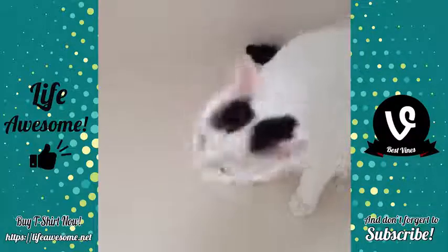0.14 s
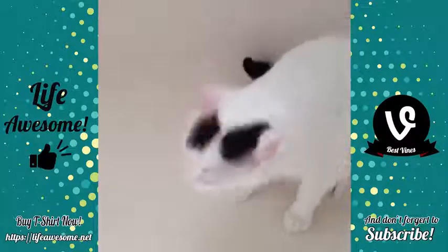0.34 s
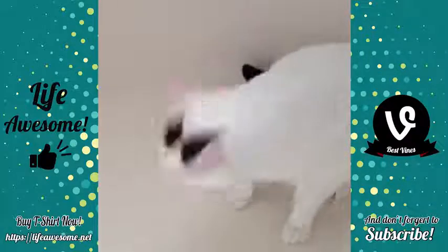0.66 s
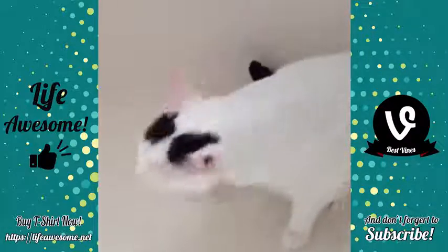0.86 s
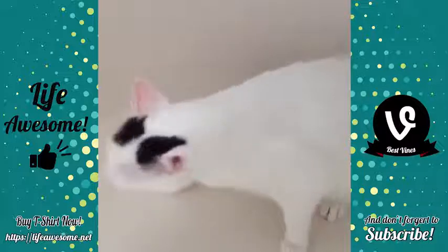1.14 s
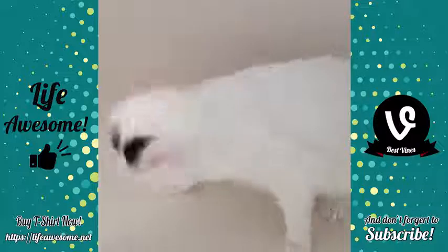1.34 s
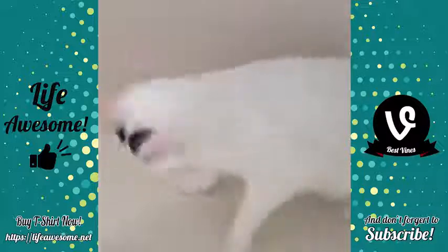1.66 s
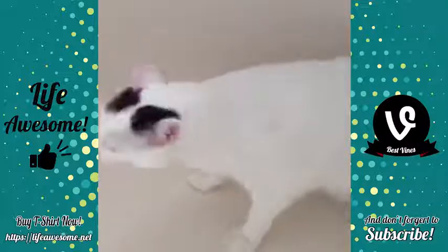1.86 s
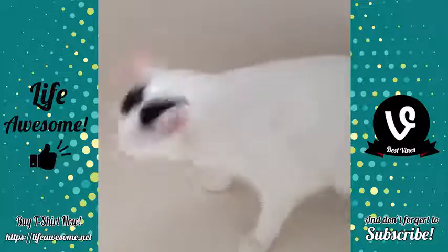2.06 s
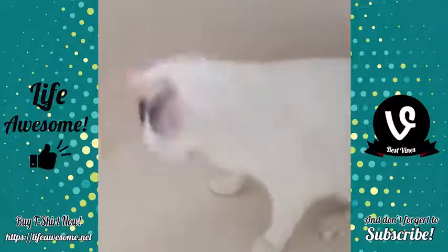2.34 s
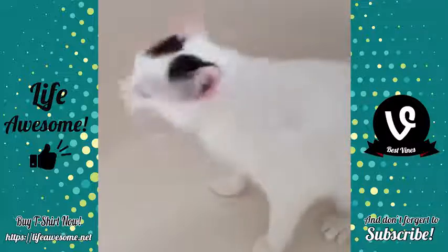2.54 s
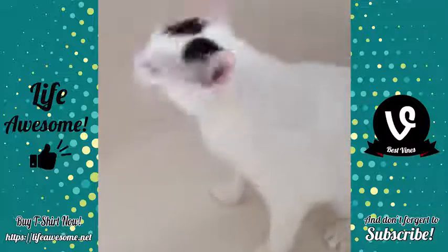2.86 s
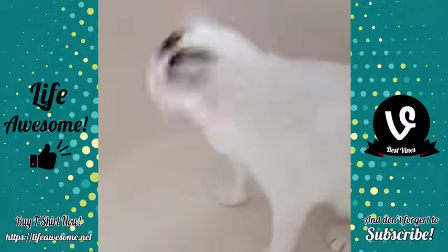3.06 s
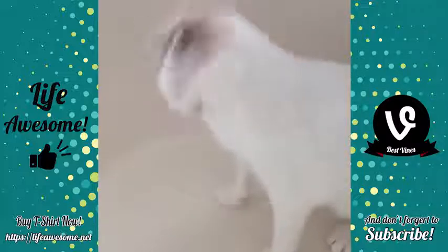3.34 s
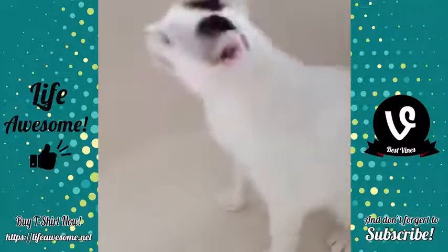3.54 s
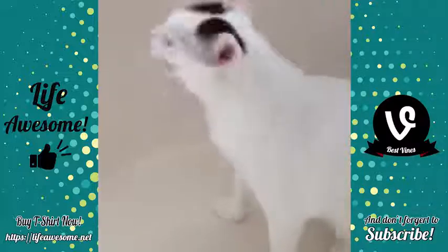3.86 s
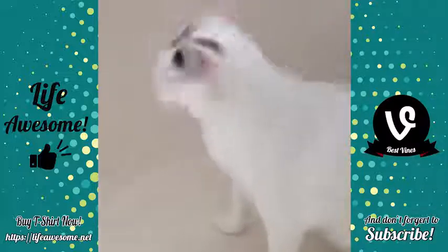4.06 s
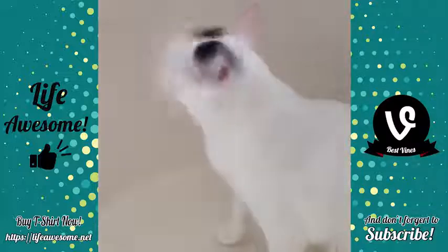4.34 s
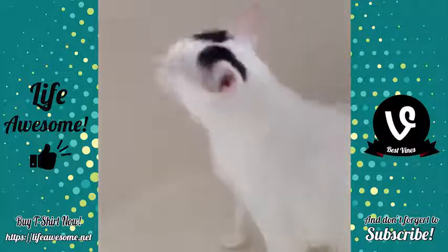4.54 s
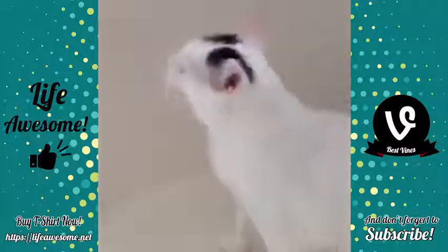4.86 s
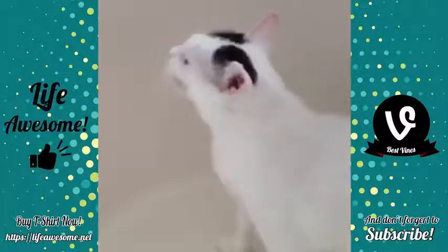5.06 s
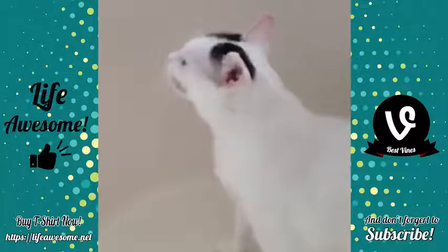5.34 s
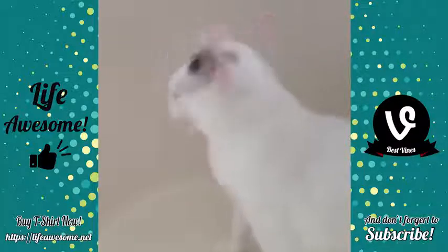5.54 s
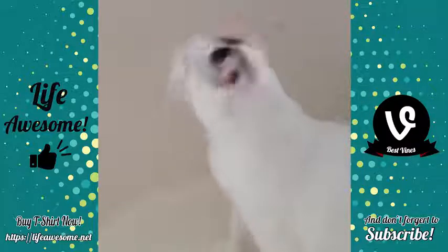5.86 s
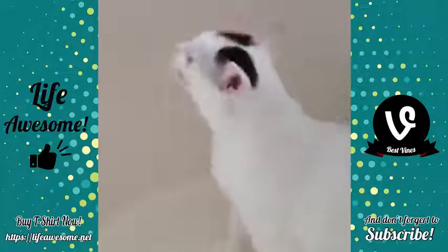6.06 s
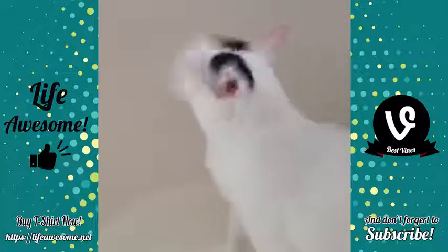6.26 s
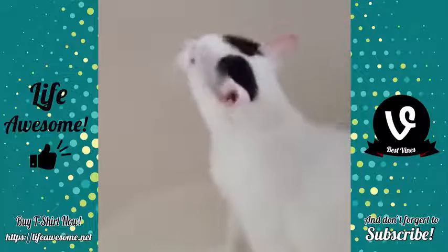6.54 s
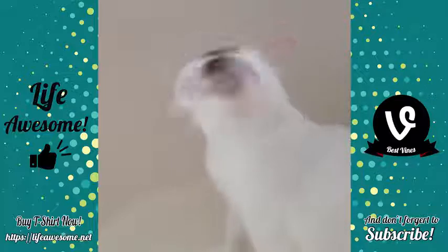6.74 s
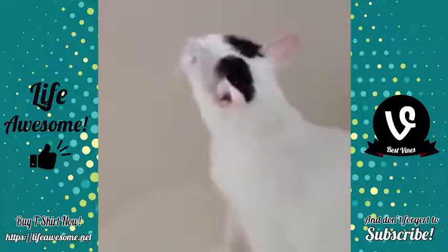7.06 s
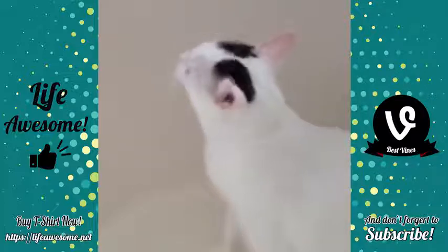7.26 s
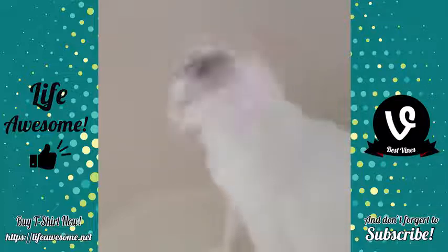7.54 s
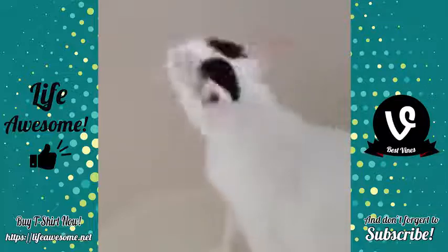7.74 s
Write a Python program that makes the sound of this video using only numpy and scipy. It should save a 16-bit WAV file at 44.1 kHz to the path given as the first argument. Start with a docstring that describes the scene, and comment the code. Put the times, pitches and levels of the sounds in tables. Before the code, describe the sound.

Close to a small microphone in a bare little room, a cat sneezes over and over, nearly three times a second. Each puff starts with a soft low pop and bursts into a short, bright nasal hiss, and the room rings briefly. A quick sniff precedes the next puff. Wet spits and tiny mouth clicks dot the first five seconds. Effort peaks around two seconds, then eases, with sniffs growing fainter. Faint humming air lies underneath.

```python
"""In a small bare room, close to a small microphone, a cat sneezes in a hissing fit; faint humming air lies under it.
Each puff opens with a low pop, then a turbulent noise jet hisses through the nose, bright near 12 kHz;
the room rings after it: noise echoes that fade band by band, and a few decaying bass tones.
Then comes a short sniff, noise through sinking airway resonances; wet spits and mouth clicks are snaps of noise.
About three puffs a second follow; the effort peaks at 2 s, then eases until the end."""
import sys
import numpy as np
from scipy import signal
from scipy.fft import rfft, irfft, next_fast_len
from scipy.io import wavfile
from scipy.ndimage import map_coordinates

SR = 44100
rng = np.random.default_rng(int(sys.argv[2]) if len(sys.argv) > 2 else 0)


def bounce(signal):
    """Save signal as a 16-bit WAV file at the path given by the first command-line argument."""
    frames = np.transpose(np.atleast_2d(signal))
    limited = np.clip(frames, -1, 1)
    pcm = np.round(limited * 32767).astype(np.int16)
    wavfile.write(sys.argv[1], SR, pcm)


N = 348831
TIME = np.arange(N) / SR

# Still air of the room: (frequency [Hz], relative density [dB per Hz])
AIR_SPECTRUM = [(30, -14), (65, -11), (125, -4.5), (155, 6), (250, 3), (450, -5.5), (1100, -7.5),
                (2500, -15), (4600, -10), (5300, -15.5), (9000, -17), (11500, -20), (15000, -16)]
AIR_DB = -74.5

# Sneeze puffs: (time [s], time to full flow [s], length of push [s], relative jet level [dB],
# lower mouth resonance [Hz], upper mouth resonance [Hz])
PUFFS = [(0.0, .025, 0.079, -33, 724, 1540), (.325, 0.028, 0.063, -32, 1100, 1430),
         (.673, 0.021, 0.078, -31.5, 600, 2110), (1.027, 0.027, 0.074, -31.5, 570, 1940),
         (1.375, 0.03, 0.075, -31, 960, 1520), (1.718, 0.03, 0.078, -30, 600, 1460),
         (2.054, .019, 0.078, -30.5, 1000, 1750), (2.404, 0.022, .076, -31, 940, 1310),
         (2.751, 0.026, 0.065, -30, 920, 1860), (3.075, 0.03, 0.078, -30.5, 880, 1840),
         (3.414, 0.021, 0.071, -32, 910, 1600), (3.745, 0.025, 0.075, -33, 860, 2030),
         (4.097, 0.029, 0.074, -31.5, 850, 1590), (4.442, 0.023, 0.078, -30.5, 830, 1930),
         (4.84, 0.028, .066, -32, 685, 2100), (5.201, .025, 0.082, -33, 745, 1980),
         (5.594, 0.028, .073, -31.5, 760, 1460), (5.969, 0.03, .076, -33, 820, 1930),
         (6.365, 0.032, 0.084, -34, 860, 2110), (6.805, .029, 0.094, -34, 860, 2080),
         (7.243, .027, .074, -32.5, 860, 1360), (7.601, 0.034, 0.084, -31.5, 800, 2040)]
# How hard the cat heaves: (time [s], effort [0-1])
EFFORT = [(0, 0.44), (1.0, 0.8), (2.0, 1.0), (3.3, 0.9), (4.1, 0.3), (5.0, 0.19), (7.8, 0)]
# The turbulent jet, before the resonances are added: (frequency [Hz], relative density [dB per Hz])
JET_SPECTRUM = [(40, -40), (130, -30.5), (200, -6), (400, -4), (850, 0), (1200, 1), (1900, 2), (2800, 2),
                (3600, -1), (4800, 0.5), (5100, -2), (6500, 3.5), (9300, -1), (15400, 1.5)]
# Settings that follow the effort: (when easy, at full effort)
CHEST_DB, THROAT_DB, LOWER_MOUTH_DB, SINUS_DB = (-0.45, 3.5), (0, 1.8), (5, 3), (1.5, 3)
NOSTRIL_HZ = (11710, 12100)
NOSTRIL_DB, UPPER_MOUTH_DB = 12.5, 2

# Ring time of the room: (frequency [Hz], time to fall by 60 dB [s])
ROOM_T60 = [(150, 0.55), (600, 0.24), (2000, 0.28), (5000, 0.3), (9000, 0.19), (12000, 0.23), (15000, 0.11)]
# Standing waves of the room: (frequency [Hz], relative level [dB])
ROOM_MODES = [(152, 6.5), (203, -12), (296, -13), (352, -4), (422, 4.5), (565, 5), (685, -4.5),
              (775, -10.5), (837, 0.5), (896, -3)]
MODE_T60_S = 0.26

# Rush of a sniff between its resonances: (frequency [Hz], relative density [dB per Hz])
INTAKE_SPECTRUM = [(200, -29), (700, -2), (1500, 4), (3200, 2), (6000, -4.5), (9000, -9.5), (12000, -6.5),
                   (15000, -11.5)]
# Airway resonances of a sniff, before each sniff shifts them: (frequency [Hz], height [dB])
AIRWAY_RESONANCES = [(1050, 11.5), (1420, 13), (2600, 16.5), (3780, 9), (4700, 12)]
# Sniff settings that follow the effort: (when easy, at full effort)
SNIFF_DB = (-73.5, -61.5)
SNIFF_LEAD_S = (0.064, 0.12)  # from the middle of a sniff to the next puff
SNIFF_SPREAD_S = (0.028, 0.037)  # of the bell-shaped swell
SNIFF_WIDTH_HZ = (300, 70)  # of the airway resonances
LAST_PAUSE_S = 0.35  # the last puff is followed by a sniff too, as if another came this much later

# Mouth clicks between puffs: (time [s], relative level [dB])
CLICKS = [(0.322, -54), (0.657, -61), (0.663, -46), (0.947, -48.5), (1.007, -54), (1.276, -46.5),
          (2.038, -64), (2.389, -56), (2.737, -57.5), (3.403, -45), (3.736, -49), (4.087, -50),
          (4.822, -55.5)]
# Wet spits inside the puffs: (time [s], relative level [dB])
SPITS = [(0.356, -18.5), (0.693, -27.5), (0.7025, -9.5), (1.055, -24), (1.393, -42.5), (1.412, -23.5),
         (1.4224, -13), (2.072, -24.5), (2.1064, -24), (2.420, -17.5), (2.773, -20), (3.434, -18.5),
         (3.467, -17), (3.788, -19)]

CUTOFF_HZ = 15350


def from_db(db):
    """Decibels to gain."""
    return 10 ** (np.asarray(db) / 20)


def rms_one(x):
    """Scale to unit power."""
    return x / np.sqrt(np.mean(x ** 2) + 1e-20)


def at_hz(points, hz):
    """Read a table along a log-frequency axis."""
    table_hz, value = np.transpose(points)
    return np.interp(np.log(np.maximum(hz, 1)), np.log(table_hz), value)


def hump(x, centre, width):
    """A bell of height 1 along frequency or time."""
    return np.exp(-0.5 * ((x - centre) / width) ** 2)


def spectrum_hz(size):
    """The frequencies in the spectrum of a sound of this many samples."""
    return np.arange(size // 2 + 1) * SR / size


def coloured(level_db, size):
    """Noise whose spectrum follows the function level_db(Hz)."""
    white = rfft(rng.standard_normal(size))
    return irfft(white * from_db(level_db(spectrum_hz(size))), size)


def flutter(t, rate):
    """Random wavering with a spread near 1, aiming at a new value `rate` times a second."""
    return np.interp(t * rate, np.arange(1024), rng.standard_normal(1024))


def by_effort(s, easy_and_full):
    """The value that the effort at this time sets between its easy and its full setting."""
    easy, full = easy_and_full
    return easy + (full - easy) * np.interp(s, *np.transpose(EFFORT))


def add(out, s, sound):
    """Mix a sound in at a time."""
    i = int(np.clip(round(s * SR), 0, N))
    out[i:i + len(sound)] += sound[:N - i]


def humming_air():
    """The still air of the room is steady noise, strongest in the bass, heard as a faint hum."""
    noise = coloured(lambda hz: at_hz(AIR_SPECTRUM, hz), size=next_fast_len(N))[:N]
    return from_db(AIR_DB) * rms_one(noise)


def puffs(nostril_width_hz=1450, chest_hz=300, chest_width_hz=380, throat_hz=1600, throat_width_hz=900,
          lower_width_hz=120, upper_width_hz=220, sinus_hz=4550, sinus_width_hz=240,
          opening=2.83, push_tilt_db=1.5, release_s=0.026,
          whistle_tilt_db=-3.0, whistle_release_s=0.048, whistle_db=1.6,
          flutter_db=1.5, flutter_rate=260, sputter_db=2.0, sputter_rate=80,
          level_db=0.81, pop_db=2.0, pop_s=0.015, pop_width_s=0.0044, pop_hz=420, pop_width_hz=470):
    """The airway opens with a low pop; pressure builds, holds and collapses; mucus makes the jet flutter."""
    out = np.zeros(N)
    t = np.arange(2 ** 14) / SR
    for s, rise, stop, jet_db, lower_hz, upper_hz in PUFFS:
        def tract(hz):
            """The resonances of chest, throat, mouth and sinuses colour the jet."""
            return (at_hz(JET_SPECTRUM, hz)
                    + by_effort(s, CHEST_DB) * hump(hz, chest_hz, chest_width_hz)
                    + by_effort(s, THROAT_DB) * hump(hz, throat_hz, throat_width_hz)
                    + by_effort(s, LOWER_MOUTH_DB) * hump(hz, lower_hz, lower_width_hz)
                    + UPPER_MOUTH_DB * hump(hz, upper_hz, upper_width_hz)
                    + by_effort(s, SINUS_DB) * hump(hz, sinus_hz, sinus_width_hz))

        def nostrils(hz):
            """The power that the narrow nostrils add on top of the jet."""
            lift = from_db(NOSTRIL_DB * hump(hz, by_effort(s, NOSTRIL_HZ), nostril_width_hz))
            return at_hz(JET_SPECTRUM, hz) + whistle_db + 10 * np.log10(lift ** 2 - 1 + 1e-9)

        def opening_pop(hz):
            """A low bump in the noise as the airway opens."""
            return pop_db + 30 * (hump(hz, pop_hz, pop_width_hz) - 1) + at_hz(JET_SPECTRUM, hz)

        after = np.maximum(t - stop, 0)
        # the sharp hiss of the nostrils needs full pressure and goes first
        whistle = from_db(whistle_tilt_db * t / stop) * np.exp(-after / whistle_release_s)
        jet = coloured(tract, size=len(t)) + whistle * coloured(nostrils, size=len(t))
        push = (1 - np.exp(-(t / rise) ** opening)) * from_db(push_tilt_db * t / stop)
        flow = push * np.exp(-after / release_s) * from_db(flutter_db * flutter(t, flutter_rate))
        pop = coloured(opening_pop, size=len(t)) * hump(t, pop_s, pop_width_s)
        puff = flow * sputtering(jet, sputter_db, sputter_rate) + pop
        add(out, s, from_db(jet_db + level_db) * puff)
    return out


def sputtering(x, depth_db, rate):
    """Eddies of each size come and go on their own: every band wavers separately."""
    t = np.arange(len(x)) / SR
    hz = spectrum_hz(len(x))
    spectrum = rfft(x)
    edges = np.linspace(0, np.sqrt(SR / 2), 18) ** 2
    out = np.zeros(len(x))
    for low, high in zip(edges, edges[1:]):
        band = irfft(spectrum * (hz >= low) * (hz < high))
        out += band * from_db(depth_db * flutter(t, rate))
    return out


def tossing_head(x, count=4):
    """The head points elsewhere at each puff and wakes another of a few sets of echoes, taken in turn."""
    puff_number = np.searchsorted([row[0] for row in PUFFS], TIME)
    return sum(room(x * (puff_number % count == k)) for k in range(count))


def room(x, wet_db=-6.0, modes_db=-57, first_echo_s=0.0054,
         treble_db=-0.5, treble_hz=12000, treble_width_hz=2500):
    """Dense echoes die away band by band; a few standing waves stand out in the bass."""
    t = np.arange(2 ** 15) / SR
    hz = spectrum_hz(len(t))
    # the bright top is beamed forward and feeds the room less
    echoes = rfft(rng.standard_normal(len(t))) * from_db(treble_db * hump(hz, treble_hz, treble_width_hz))
    onset = np.clip(t / first_echo_s - 1, 0, 1)
    edges = np.linspace(0, np.sqrt(SR / 2), 16) ** 2
    tail = np.zeros(len(t))
    for low, high in zip(edges, edges[1:]):
        t60 = at_hz(ROOM_T60, (low + high) / 2)
        fade = from_db(-60 * t / t60) * onset
        band = irfft(echoes * (hz >= low) * (hz < high))
        tail += band * fade / np.linalg.norm(fade)
    standing = np.zeros(len(t))
    for mode_hz, db in ROOM_MODES:
        standing += from_db(modes_db + db - 60 * t / MODE_T60_S) * np.cos(2 * np.pi * mode_hz * t)
    return signal.oaconvolve(x, from_db(wet_db) * tail + standing)[:N]


def sniffs(shift=0.024, sink_per_s=0.45):
    """Air drawn in before the next puff: sinking airway resonances, sharper and louder with more effort."""
    out = np.zeros(N)
    t = np.arange(2 ** 13) / SR
    middle = t[-1] / 2
    starts = [row[0] for row in PUFFS]
    # reading the noise ever more slowly makes its resonances sink
    glide = (t - sink_per_s * (t - middle) ** 2 / 2) * SR
    for next_puff in starts[1:] + [starts[-1] + LAST_PAUSE_S]:
        s = next_puff - by_effort(next_puff, SNIFF_LEAD_S)
        stretch = 1 + shift * rng.standard_normal()  # the mouth is never held quite the same
        width_hz = by_effort(s, SNIFF_WIDTH_HZ)

        def airway(hz):
            """The intake rush, raised by the strongest resonance at each frequency."""
            peaks = [top * hump(hz, f * stretch, width_hz) for f, top in AIRWAY_RESONANCES]
            return at_hz(INTAKE_SPECTRUM, hz) + np.max(peaks, axis=0)

        rush = map_coordinates(coloured(airway, size=len(t)), [glide], mode="wrap")
        swell = from_db(by_effort(s, SNIFF_DB)) * hump(t, middle, by_effort(s, SNIFF_SPREAD_S))
        add(out, s - middle, swell * rms_one(rush))
    return out


def wet_snaps(events, fade_s, bright_db, bright_hz, width_hz):
    """A film of saliva bursts: a few milliseconds of bright noise."""
    out = np.zeros(N)
    t = np.arange(2 ** 10) / SR
    for s, snap_db in events:
        snap = coloured(lambda hz: at_hz(JET_SPECTRUM, hz) + bright_db * hump(hz, bright_hz, width_hz),
                        size=len(t))
        add(out, s, from_db(snap_db) * rms_one(snap) / 2 * np.exp(-t / fade_s))
    return out


def scene():
    """The cat close by, its echoes in the room, and the faint humming air."""
    air = humming_air()
    clicks = wet_snaps(CLICKS, fade_s=0.002, bright_db=17.0, bright_hz=12100, width_hz=1800)
    spits = wet_snaps(SPITS, fade_s=0.0015, bright_db=8, bright_hz=12000, width_hz=1400)
    cat = puffs() + sniffs() + clicks + spits
    return (cat + tossing_head(cat) + air)[None]


def record(dry):
    """The small microphone sheds the bass; the top is cut steeply."""
    bass_cut = signal.butter(1, 110, "high", fs=SR, output="sos")
    top_cut = signal.ellip(12, 0.2, 85, CUTOFF_HZ, fs=SR, output="sos")
    return signal.sosfilt(top_cut, signal.sosfilt(bass_cut, dry))


dry = scene()
out = record(dry)
bounce(out)
```